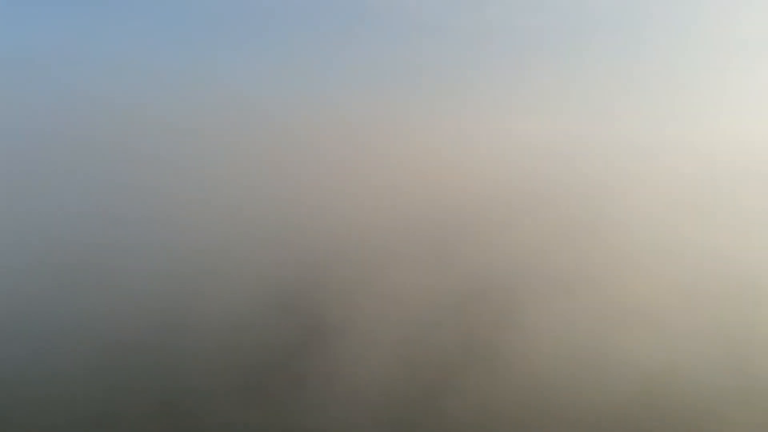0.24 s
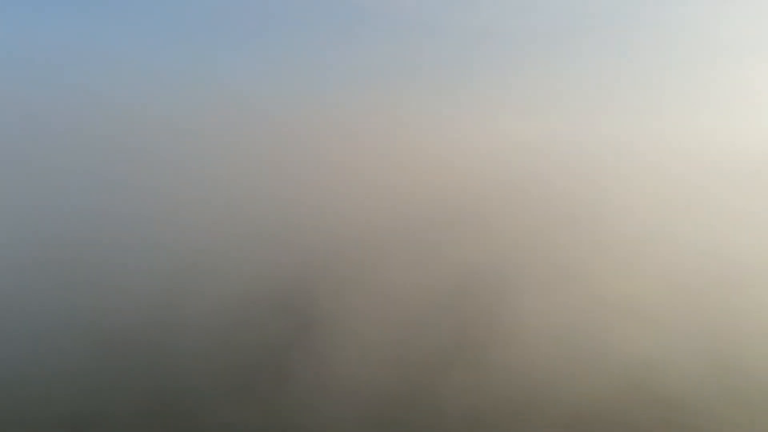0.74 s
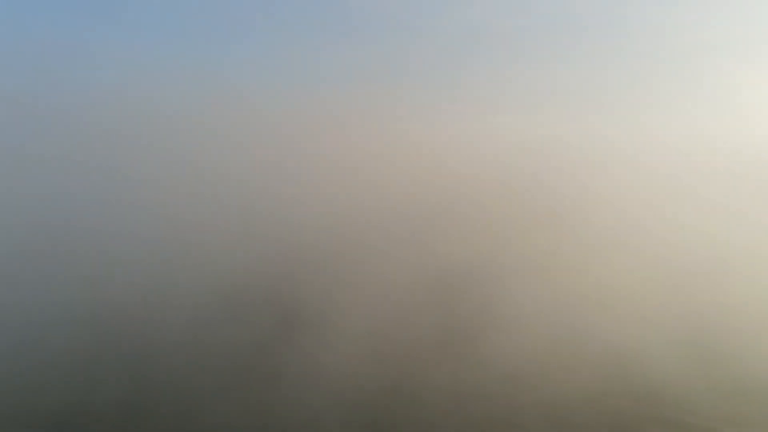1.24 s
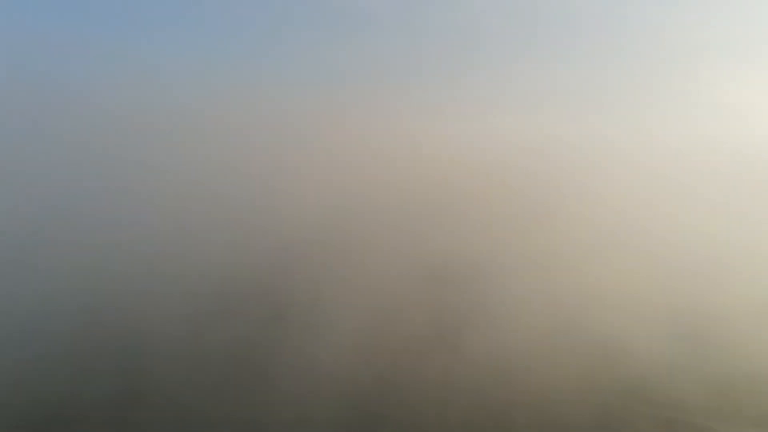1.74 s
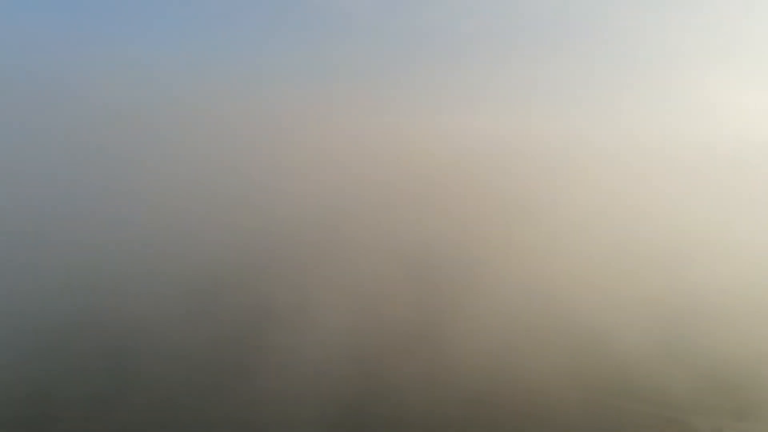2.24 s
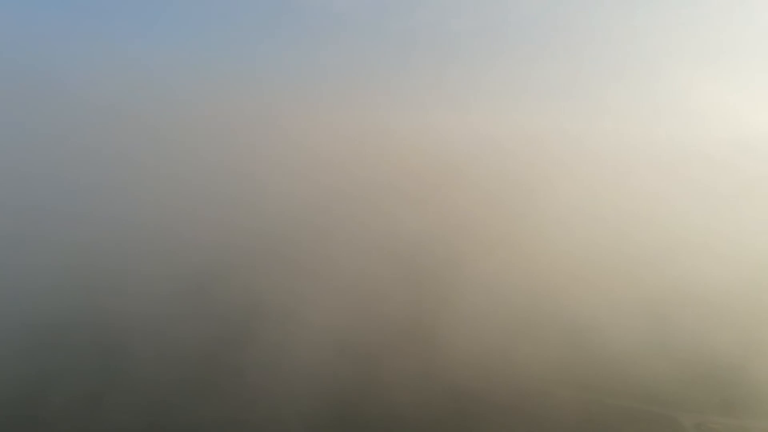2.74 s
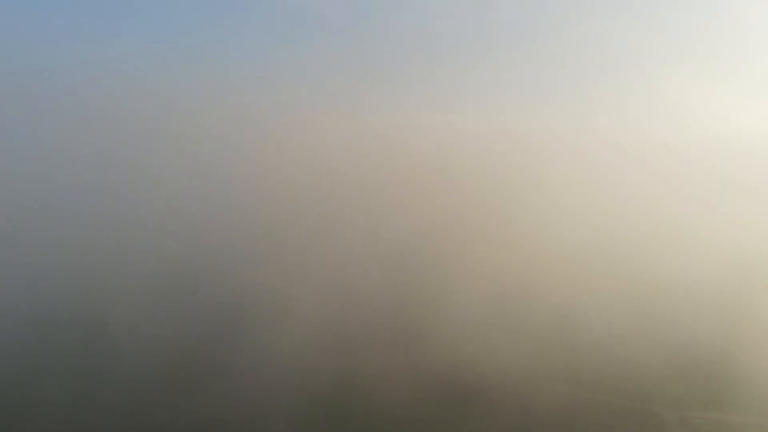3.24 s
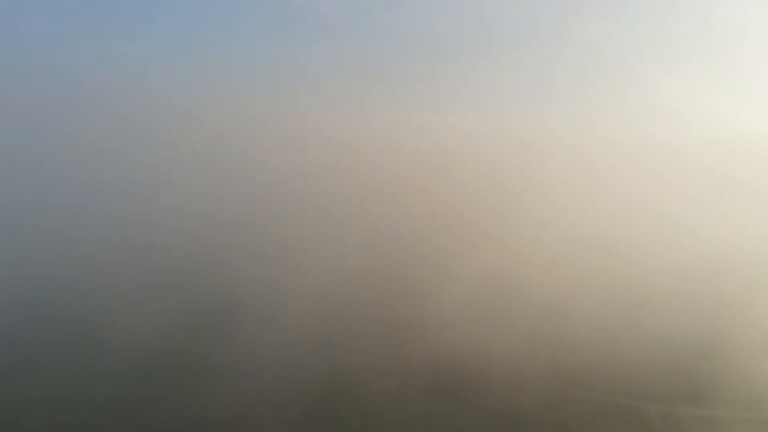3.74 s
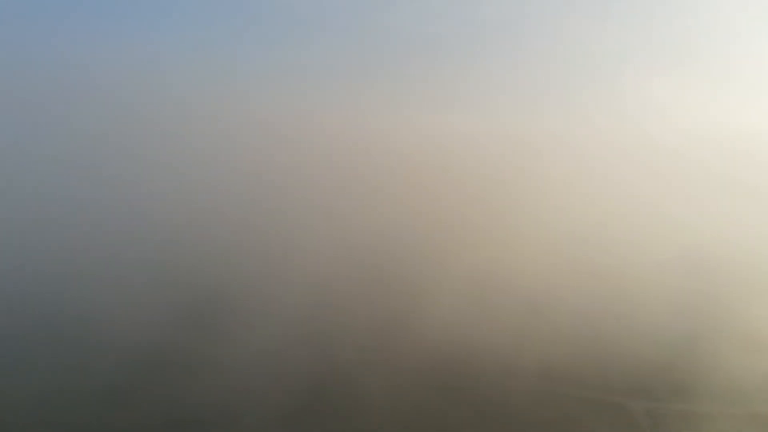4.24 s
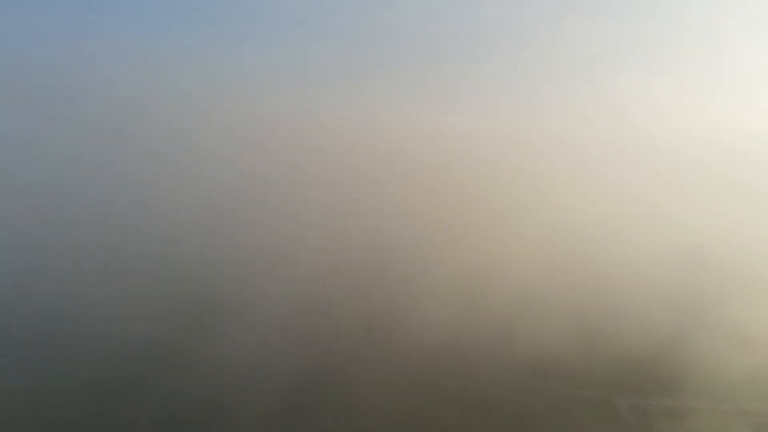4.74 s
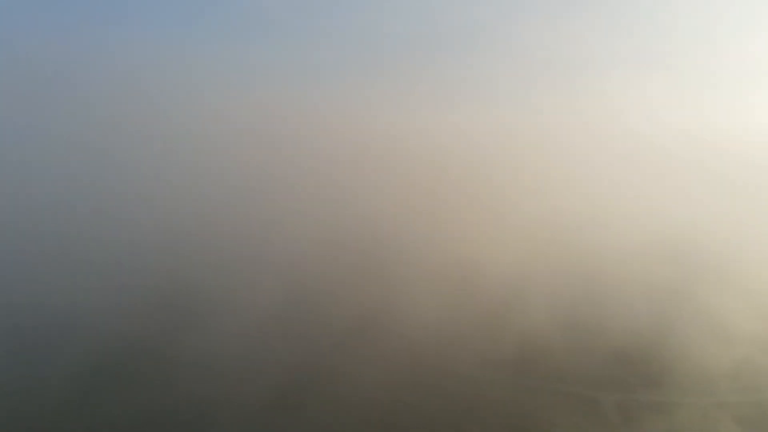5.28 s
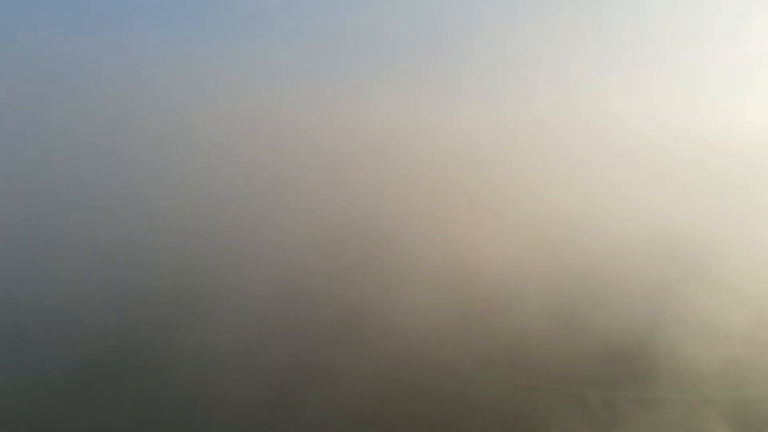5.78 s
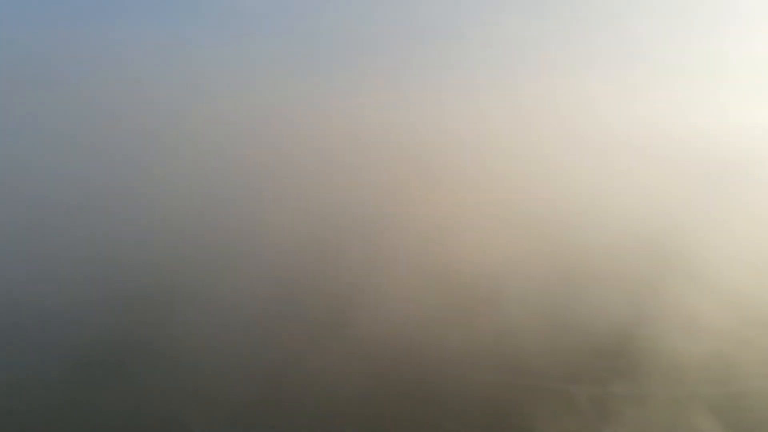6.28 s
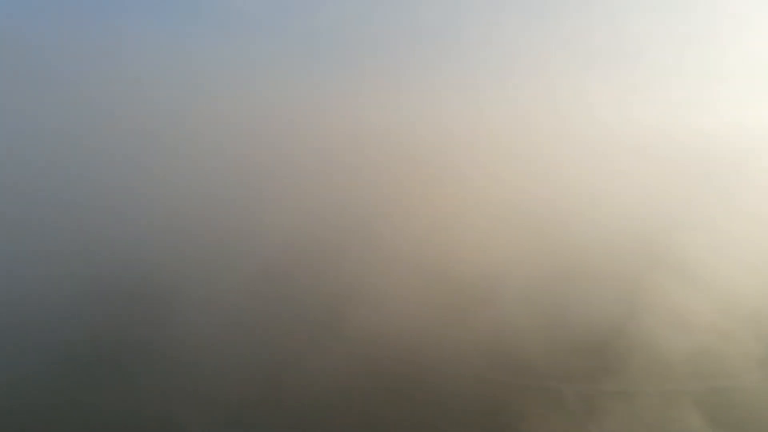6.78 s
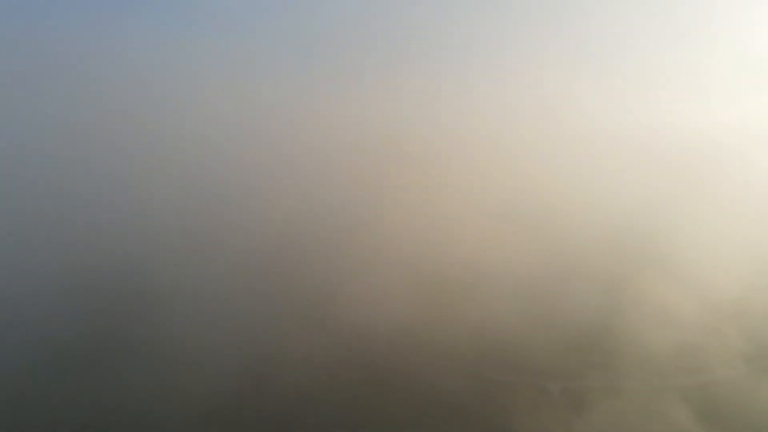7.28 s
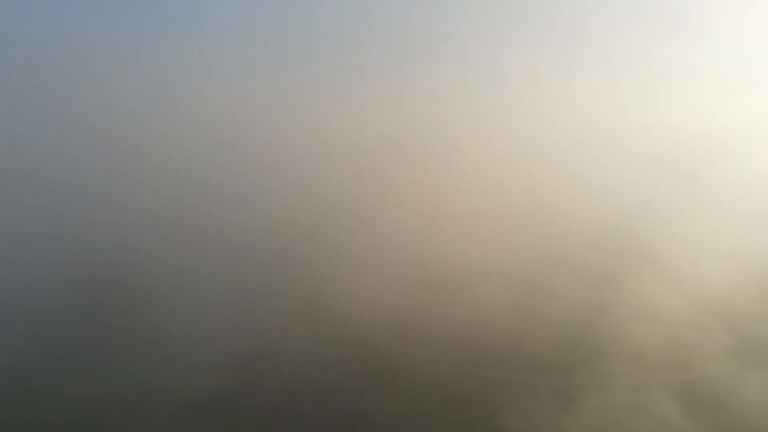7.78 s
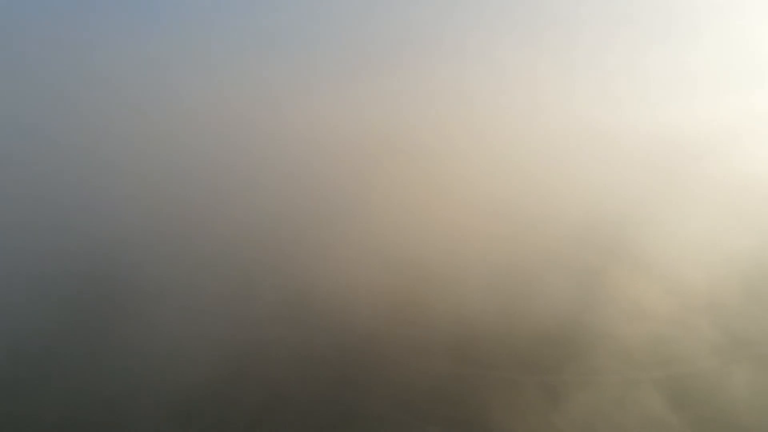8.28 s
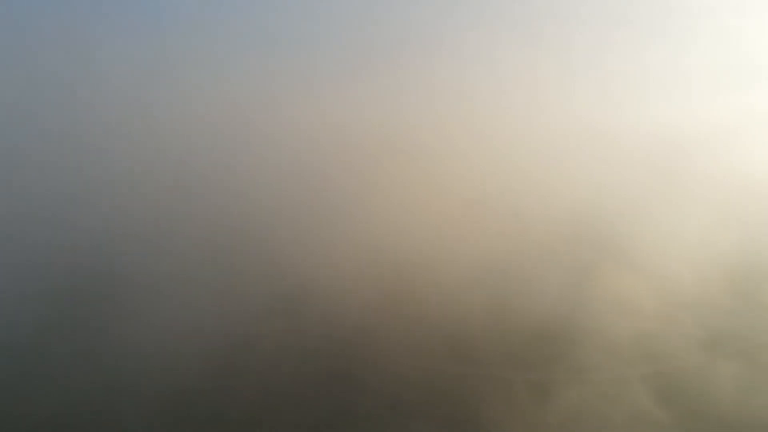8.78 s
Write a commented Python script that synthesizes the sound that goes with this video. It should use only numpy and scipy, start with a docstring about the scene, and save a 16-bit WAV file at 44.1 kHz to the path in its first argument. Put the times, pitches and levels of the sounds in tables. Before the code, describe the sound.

Many small birds twitter over moving water. Scattered chirps open, a bright one sounds near two seconds, then a calmer gap with tiny falling pips and a long faint whistle. Strong quick chirps come just after five seconds, then nearly continuous twitter from six to under eight, a brief thinning, and final chirps. Constant airy hiss, low rush and faint mains hum; natural echoes, near and far layers, stationary outdoor microphone.

```python
"""Small birds close by twitter in steep, husky chirps over river hiss at misty dawn; a crowd of others
chatters further off and a few whistle lower down. Each call is a gliding tone under a swell, plus echoes.
The river is two bands of shaped noise; the mains hum is two wavering sines.
Slow air on the microphone is noise below about 15 Hz."""
import sys
import numpy as np
from scipy import signal
from scipy.fft import rfft, irfft
from scipy.io import wavfile
from scipy.ndimage import uniform_filter1d

SR = 44100
rng = np.random.default_rng(int(sys.argv[2]) if len(sys.argv) > 2 else 0)


def wrap_up_sound(samples):
    """Save the sound to the file named by the first command line argument, as 16-bit audio."""
    columns = np.atleast_2d(samples).T
    # keep every value between -1 and 1, then stretch to whole-number steps
    tamed = np.clip(columns, -1, 1)
    steps = np.round(tamed * 32767).astype(np.int16)
    wavfile.write(sys.argv[1], SR, steps)


N = 397782


def from_db(db):
    """Decibels to amplitude gain."""
    return 10 ** (np.asarray(db) / 20)


def rms_one(x):
    """Scale to rms 1."""
    return x / np.sqrt(np.mean(x ** 2) + 1e-20)


def in_time(rows):
    """Interpolate each column of a curve to one value a sample; the first column is time."""
    time_s, *columns = np.transpose(rows)
    return [np.interp(np.arange(N) / SR, time_s, column) for column in columns]


def drift(rate_hz):
    """Slow chance: white noise twice through a one-pole low-pass, rms 1."""
    pole = np.exp(-2 * np.pi * rate_hz / SR)
    white = rng.standard_normal(N + SR)
    settled = signal.lfilter([1], [1, -2 * pole, pole * pole], white)[SR:]
    return rms_one(settled)


def coloured(spectrum):
    """Steady noise with the given spectrum, rms 1."""
    hz = np.arange(1, N // 2 + 2) * SR / N
    point_hz, point_db = np.transpose(spectrum)
    shape = from_db(np.interp(np.log(hz), np.log(point_hz), point_db))
    return rms_one(irfft(rfft(rng.standard_normal(N)) * shape, N))


def scatter(x, t60_s, size=22050):
    """Trees and banks return a dense smear of echoes that dies away; energy 1."""
    decay = from_db(-60 * np.arange(size) / SR / t60_s)
    tail = rng.standard_normal(size) * decay
    return signal.fftconvolve(x, tail / np.sqrt(np.sum(tail ** 2)))[:N]


AIR_DB, AIR_HZ = -33.5, 5.4   # rms before the low-pass; corner of the drift


def air():
    """Slow pressure swings on the microphone, mostly below hearing."""
    low_pass = signal.butter(4, 15, fs=SR, output="sos")
    return from_db(AIR_DB) * signal.sosfilt(low_pass, drift(AIR_HZ))


# mains harmonics: pitch_hz, peak_db (against the rush level)
HUM = [(100, -7.5), (200, -16.5)]


def hum(rush_db):
    """Mains hum, wavering a little in level and phase; it swells with the rush."""
    t = np.arange(N) / SR
    out = np.zeros(N)
    for pitch_hz, peak_db in HUM:
        level_db = peak_db + rush_db + 2.54 * drift(5.0)
        phase_rad = 2 * np.pi * pitch_hz * t + 1.64 * drift(2.66)
        out += from_db(level_db) * np.sin(phase_rad)
    return out


# low rush spectrum: freq_hz, density_db (relative, per Hz)
RUSH = [(12, -19), (20, 5.5), (34, -10), (60, -12), (105, -13), (145, -17), (206, -18.5), (1290, -31),
        (3560, -27), (4800, -28), (7500, -47), (9750, -88), (16500, -120)]
# high hiss spectrum: freq_hz, density_db (relative, per Hz)
HISS = [(4120, -28), (7000, -39), (7410, -12.5), (7840, -13), (9520, 7), (10800, 6.5), (12000, -3),
        (13000, -7.5), (15600, -11)]


def river(rush_db, hiss_db):
    """Moving water: low rush and high hiss, two noise bands flickering separately in level."""
    rush = from_db(rush_db + 1.85 * drift(25.0)) * coloured(RUSH)
    hiss = from_db(hiss_db + 1.1 * drift(12)) * coloured(HISS)
    return rush + hiss


# overtone transmission by overtone pitch: freq_hz, gain_db
OVERTONES = [(6000, 8), (8000, -1.5), (10000, -0.5), (12000, 7.5), (14500, -41)]
LEVELS_OFF_MS = 1.72   # past the peak, the glide flattens on this time scale
LOWER_VOICE = .79   # pitch ratio, second side of the syrinx to the first


def chirps(peak_s, pitch_hz, peak_db, overtones_db, swell_s, glide_hz_per_ms, rough_hz, lower_db=-60, size=960):
    """Gliding tones, two overtones, bell-shaped swell; the syrinx flutters and its other side sounds lower."""
    step = (np.arange(size) - size * 5 // 8)[:, None]   # samples from the peak
    at = np.clip((peak_s * SR).astype(int) + step, 0, N - 1)
    ms = step * 1000 / SR
    glide_ms = np.where(ms < 0, ms, LEVELS_OFF_MS * np.tanh(ms / LEVELS_OFF_MS))
    flutter_hz = rough_hz * drift(600)[at]
    hz = np.maximum(pitch_hz + glide_hz_per_ms * glide_ms + flutter_hz, 500)
    phase = 2 * np.pi * np.cumsum(hz, axis=0) / SR
    tone = np.sin(phase) + from_db(lower_db) * np.sin(LOWER_VOICE * phase)
    for multiple in (2, 3):
        colour_db = np.interp(multiple * hz, *np.transpose(OVERTONES), right=-60)
        tone = tone + from_db(overtones_db + colour_db) * np.sin(multiple * phase)
    width_s = swell_s * np.where(step < 0, 1.9, 1.15)   # rises more slowly than it falls
    swell = np.exp(-.5 * (step / SR / width_s) ** 2)
    notes = from_db(peak_db) * swell * tone
    return np.bincount(at.ravel(), notes.ravel(), N)


def songsters(rush_db, count=300):
    """Faint, blurred short whistles slur gently up or down at random moments; level follows the rush."""
    pitch_draw, level_draw, glide_draw = rng.standard_normal((count, 3)).T
    at = rng.integers(0, N, count)
    pitch_hz = 2800 * np.exp(.23 * np.clip(pitch_draw, -1.6, 1.5))
    peak_db = rush_db[at] - 12.5 + 1.5 * level_draw
    notes = chirps(at / SR, pitch_hz, peak_db, overtones_db=-49, swell_s=0.011,
                   glide_hz_per_ms=9.7 * glide_draw, rough_hz=70.0, size=3000)
    return notes + from_db(2.0) * scatter(notes, 0.11)


# short slurred whistles: start_s, length_s, from_hz, to_hz, level_db, swell_db (change along the note)
WHISTLES = [(0.156, 0.13, 1496, 1864, -49, -8), (0.785, 0.1, 4144, 4080, -48, -9),
            (1.436, 0.25, 3890, 3780, -50.5, -18), (1.494, 0.095, 3480, 3530, -49, -10),
            (2.08, 0.21, 1983, 2000, -50.5, -2), (2.207, 0.15, 2670, 2660, -48.5, -8),
            (2.323, 0.15, 2000, 2110, -48, -5), (2.37, 0.062, 3340, 3330, -48, -1),
            (2.73, 0.092, 2200, 2180, -47, 4), (2.889, 0.068, 2620, 2670, -45, -2),
            (3.48, .1, 3000, 3050, -48, -11), (3.79, 0.12, 3400, 3580, -48, -4),
            (4.096, 0.2, 3250, 2430, -47.5, -1), (4.303, 0.046, 4200, 3560, -40, 6),
            (4.474, 0.055, 3270, 3360, -46, -5), (4.488, 0.099, 4080, 3990, -42, -13),
            (4.718, 0.048, 3370, 3310, -39, -1), (4.81, 0.039, 3140, 3080, -43.5, 0),
            (4.896, 0.12, 2960, 2770, -41.5, 7), (5.12, 0.05, 3160, 3180, -42, -15),
            (5.51, 0.088, 3620, 3380, -45, -5), (5.529, 0.1, 2900, 3100, -48, -8),
            (5.663, 0.21, 3810, 3530, -48, 4), (5.919, 0.072, 2580, 2310, -45.5, 4),
            (6.045, 0.11, 3120, 3034, -45, 12), (6.09, 0.054, 2540, 2390, -42, 2),
            (6.86, 0.18, 1693, 1890, -49, -1), (7.236, 0.116, 2170, 2300, -46, 7),
            (7.966, 0.1, 1530, 1600, -50, -3), (8.187, 0.079, 1690, 1740, -48, -7)]
# long level whistle: time_s, pitch_hz, level_db
LEVEL_WHISTLE = [(2.62, 1830, -53), (3.6, 1895, -50), (3.95, 1920, -50), (4.34, 1895, -49.5)]
# long wavering whistle: time_s, pitch_hz, level_db
WAVERING_WHISTLE = [(8.31, 1383, -51), (8.409, 1443, -39.5), (8.499, 1308, -45.5), (8.56, 1273, -55),
                    (8.68, 1450, -54), (8.78, 1294, -50)]
# quick falling pip of one bird: length_s, from_hz, to_hz, level_db, swell_db
PIP = (.018, 2330, 1930, -41, 2)
PIP_FIRST_S, PIP_EVERY_S = 2.549, .1535


def whistle_curves(pip_count=4):
    """Short whistles slide straight between two pitches and levels; long ones follow their curves."""
    pips = [(PIP_FIRST_S + k * PIP_EVERY_S, *PIP) for k in range(pip_count)]
    curves = []
    for start_s, length_s, from_hz, to_hz, level_db, swell_db in WHISTLES + pips:
        start = (start_s, from_hz, level_db - swell_db / 2)
        end = (start_s + length_s, to_hz, level_db + swell_db / 2)
        curves.append([start, end])
    return curves + [LEVEL_WHISTLE, WAVERING_WHISTLE]


def whistles(throb_db=3.2):
    """Near-pure tones on their pitch curves, throbbing unevenly, with soft ends and echoes."""
    out, t = np.zeros(N), np.arange(N) / SR
    waver = from_db(0.06 * drift(90))   # pitch ratio
    for rows in whistle_curves():
        hz, level_db = in_time(rows)
        edge_s = np.minimum(t - rows[0][0], rows[-1][0] - t)
        ends = np.clip(edge_s / 0.007, 0, 1)
        tone = np.sqrt(2) * np.sin(2 * np.pi * np.cumsum(hz * waver) / SR)   # rms 1
        out += ends * from_db(level_db) * tone
    throb = drift(41)
    quick = rms_one(throb - uniform_filter1d(throb, size=SR // 16))   # slow part removed
    out *= from_db(throb_db * quick)
    return out + from_db(-6.5) * scatter(out, .25)


# bouts of far chatter: middle_s, half_length_s (power falls to 1/e), level_db
BOUTS = [(0.26, 0.032, -35), (0.432, 0.044, -28.5), (0.762, 0.043, -33.5), (1.082, 0.056, -37.5),
         (1.859, 0.13, -32.5), (2.147, 0.124, -41.5), (3.01, 0.082, -33.5), (3.419, 0.11, -30),
         (3.965, 0.11, -42.5), (4.372, 0.061, -39.5), (4.556, 0.11, -39), (5.073, 0.065, -34.5),
         (5.34, 0.077, -34.5), (5.685, 0.247, -39), (6.171, 0.031, -32.5), (6.849, 0.41, -32),
         (7.65, 0.29, -33.5), (8.397, 0.17, -34), (8.595, .06, -31), (8.737, 0.049, -30.5)]
LULL_DB, LULL_HZ, EAGER_HZ_PER_DB = -46, 3450, 62   # between bouts; pitch rise with level


def chatter_effort():
    """Bouts swell and fade like a bell over a steady lull; pitch rises with level."""
    t = np.arange(N) / SR
    power = from_db(LULL_DB) ** 2
    for middle_s, half_length_s, bout_db in BOUTS:
        power = power + from_db(bout_db) ** 2 * np.exp(-((t - middle_s) / half_length_s) ** 2)
    level_db = 10 * np.log10(power)
    return level_db, LULL_HZ + EAGER_HZ_PER_DB * (level_db - LULL_DB)


def chatter(count=2600, flocks=4):
    """Distant flocks: notes at random moments, spread about the middle pitch, mostly gliding up."""
    level_db, middle_hz = chatter_effort()
    out = np.zeros(N)
    for _ in range(flocks):
        pitch_draw, level_draw, glide_draw = rng.standard_normal((count // flocks, 3)).T
        at = rng.integers(0, N, count // flocks)
        pitch_hz = middle_hz[at] * np.exp(.23 * np.clip(pitch_draw, -3, 1.1))
        peak_db = level_db[at] + 2.74 * level_draw
        notes = chirps(at / SR, pitch_hz, peak_db, overtones_db=-11.0, swell_s=0.0032,
                       glide_hz_per_ms=90 + 110 * glide_draw, rough_hz=195.0)
        out += from_db(-6.5) * notes + from_db(-7) * scatter(notes, .12)
    no_lows = signal.butter(2, 1500, "high", fs=SR, output="sos")   # small throats carry no lows
    return signal.sosfilt(no_lows, out)


# near twitter notes: peak_s, pitch_hz, peak_db, overtones_db (against the note)
TWITTER = [(0.012, 4700, -31, -21), (0.065, 4840, -30, -23), (0.083, 4310, -28, -27),
           (0.131, 5650, -29.5, -15), (0.15, 5400, -25.5, -11), (0.259, 5600, -25, -18),
           (0.273, 5300, -27, -7), (0.391, 5200, -35, -20), (0.423, 5340, -21, -11), (0.71, 4500, -31, -4),
           (0.736, 5000, -24.5, -8), (1.048, 5430, -26, -20), (1.107, 5340, -23, -26),
           (1.137, 4450, -32, -17), (1.153, 4350, -35, -17), (1.792, 4560, -29, 2.5),
           (1.818, 5250, -15, -11), (1.913, 4740, -22.5, -9), (1.933, 5600, -23.5, -11),
           (1.95, 4900, -27.5, 0), (2.045, 5180, -27, -26), (2.101, 5140, -27, -12),
           (2.733, 4600, -33.5, -5), (2.921, 4390, -30, -5.5), (2.954, 4760, -23.5, -10.5),
           (3.04, 4370, -25.5, -21), (3.072, 4250, -30, -8), (3.264, 4910, -24.5, -7),
           (3.352, 4910, -27.5, 2.5), (3.392, 5000, -30, 5.5), (3.47, 4940, -23.5, -2.5),
           (3.498, 3980, -27.5, -6), (3.904, 4300, -34, -20), (4.049, 4300, -33, -23),
           (4.518, 5080, -27.5, -19), (4.608, 4600, -33, -20), (4.644, 4250, -33, -20),
           (5.034, 4820, -24, -13), (5.078, 3620, -31, -23), (5.116, 3900, -26, -26),
           (5.268, 6070, -22.5, -27), (5.294, 5240, -14, -22), (5.317, 5200, -13, -22),
           (5.339, 5100, -22.5, -20), (5.846, 4760, -21.5, -18), (5.925, 4050, -29, -14),
           (5.939, 4910, -29, -18), (6.139, 4500, -30.5, -1), (6.165, 4600, -22, -17),
           (6.262, 5900, -31, -15), (6.284, 4870, -23, -7.5), (6.312, 4950, -30, -17),
           (6.357, 5600, -30, -8), (6.38, 4650, -24.5, -9), (6.411, 4280, -28, -28),
           (6.469, 4700, -27, -26), (6.579, 5000, -22.5, -26), (6.6, 5070, -25, -26), (6.66, 4800, -23, -8),
           (6.684, 4550, -22, -11), (6.695, 5200, -25.5, -4), (6.757, 6900, -35, -30),
           (6.781, 4900, -19.5, -16), (6.804, 5040, -18.5, -18), (6.823, 4570, -25, -26),
           (6.903, 5000, -23.5, -5), (7.031, 4590, -22.5, -12), (7.179, 5000, -23.5, -21),
           (7.205, 4570, -24.5, -26), (7.24, 4740, -24, -26), (7.393, 4480, -25, -7.5),
           (7.415, 4800, -20, -14), (7.618, 4570, -25, -6), (7.645, 4480, -28, -8), (7.715, 5340, -28, -5),
           (7.741, 4790, -24, -7), (8.341, 3900, -27, -17), (8.568, 4480, -33, -3), (8.595, 5170, -18, -25),
           (8.714, 5170, -24, -9), (8.737, 3640, -23, -10), (8.761, 4480, -26, -15)]
# husky, drawn-out calls: peak_s, pitch_hz, peak_db, overtones_db (against the note), swell_s (width scale)
HUSKY = [(0.161, 3690, -28, -18, 0.0099), (0.315, 3730, -24.5, -16, 0.014), (0.445, 3490, -42, -18, 0.013),
         (0.763, 4170, -22, -15, 0.0031), (1.953, 3690, -31.5, -9, 0.0095), (3.562, 3860, -33, -30, 0.0082),
         (5.887, 3570, -29, -23, 0.0066), (6.193, 4090, -18.5, -21, 0.0034),
         (6.889, 5040, -23.5, -15, 0.012), (7.015, 4700, -24, -22, 0.012), (7.159, 1055, -40, -10, 0.028),
         (8.295, 4340, -24, -20, 0.015)]


def twitter(count=3):
    """Near birds sit on different perches, each with echoes of its own; husky calls have another."""
    notes = np.array(TWITTER)
    glide = 165 + 55 * rng.standard_normal(len(notes))   # Hz per ms
    perches = []
    for k in range(count):
        perches.append(chirps(*notes[k::count].T, swell_s=0.002, glide_hz_per_ms=glide[k::count],
                              rough_hz=206, lower_db=-10.5))
    perches.append(chirps(*np.transpose(HUSKY), glide_hz_per_ms=-7, rough_hz=269, size=8000))
    return sum(calls + from_db(-3.5) * scatter(calls, .22) for calls in perches)


# river levels: time_s, rush_db, hiss_db (before flicker)
RIVER = [(0.0, -37, -41.5), (0.27, -41.5, -41), (3.01, -40, -43), (3.39, -40.5, -39), (3.99, -40.5, -42.5),
         (4.55, -39.5, -41.5), (6.1, -41, -42.5), (6.98, -35.5, -38), (8.14, -36.5, -40), (8.49, -39, -39),
         (9.02, -34, -38.5)]


def scene():
    """Birds with their echoes over river, hum and air."""
    rush_db, hiss_db = in_time(RIVER)
    background = air() + hum(rush_db) + river(rush_db, hiss_db)
    birds = songsters(rush_db) + whistles() + chatter() + twitter()
    return (background + birds)[None]


CUTOFF_HZ = 15730


def record(dry):
    """A steep elliptic low-pass cuts the top."""
    steep = signal.ellip(12, .5, 70, CUTOFF_HZ, fs=SR, output="sos")   # ripple, stopband in dB
    return signal.sosfilt(steep, dry)


dry = scene()
out = record(dry)
wrap_up_sound(out)
```